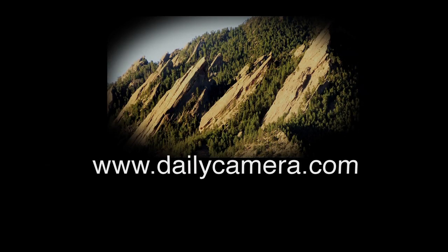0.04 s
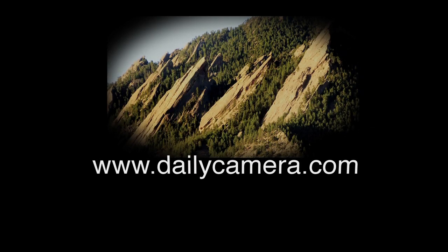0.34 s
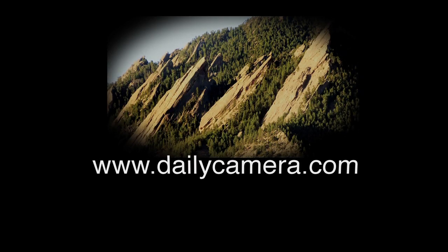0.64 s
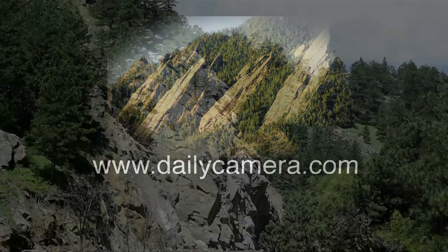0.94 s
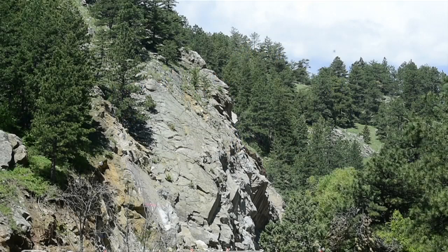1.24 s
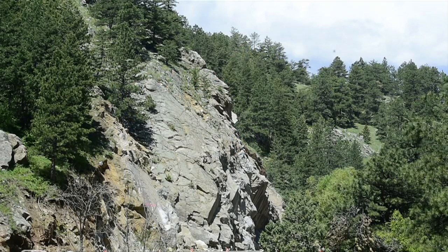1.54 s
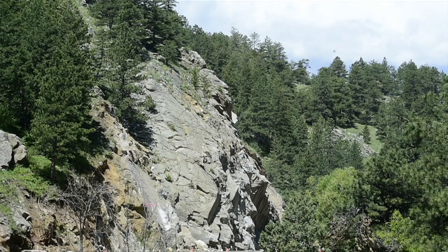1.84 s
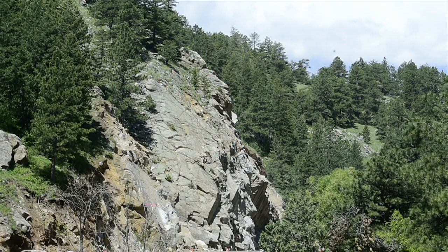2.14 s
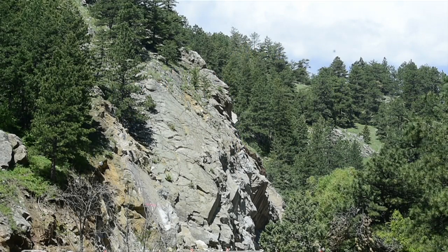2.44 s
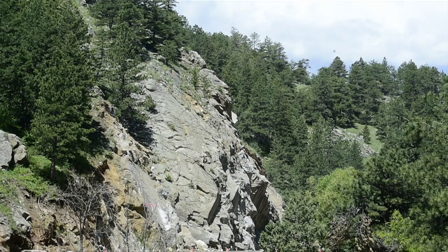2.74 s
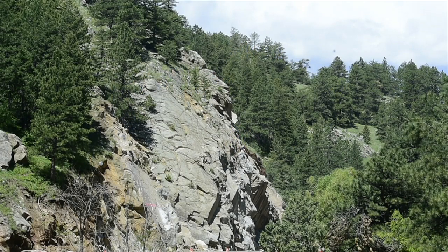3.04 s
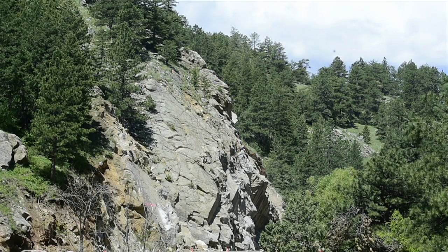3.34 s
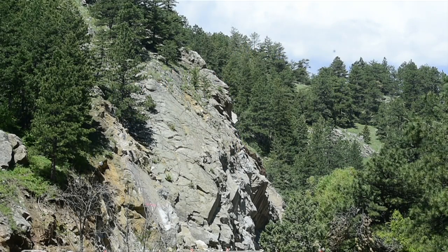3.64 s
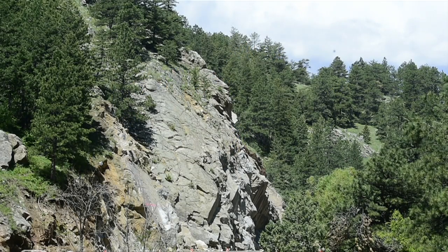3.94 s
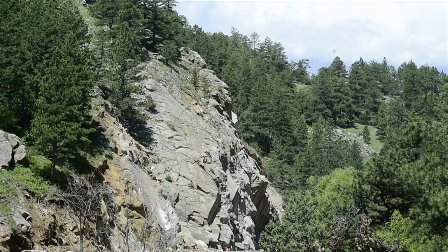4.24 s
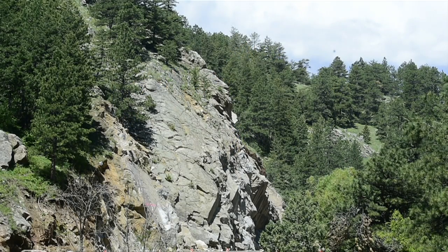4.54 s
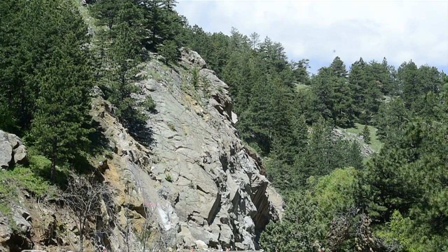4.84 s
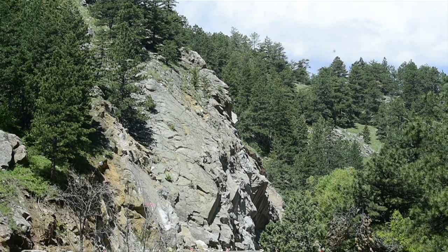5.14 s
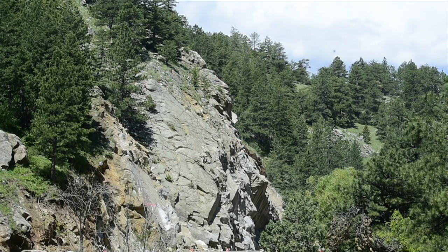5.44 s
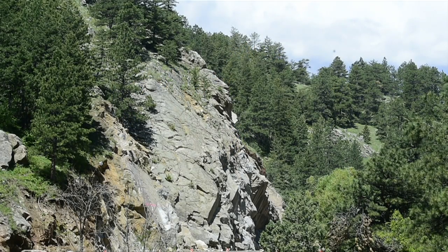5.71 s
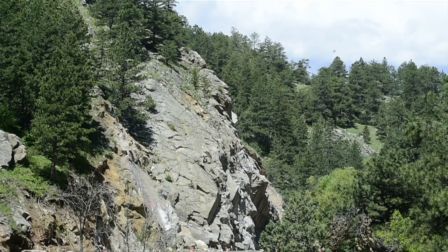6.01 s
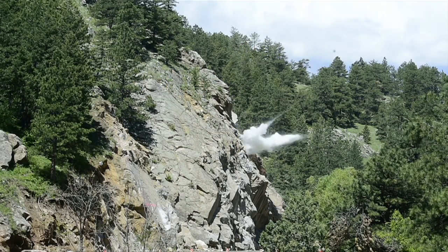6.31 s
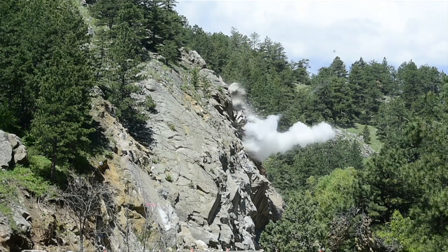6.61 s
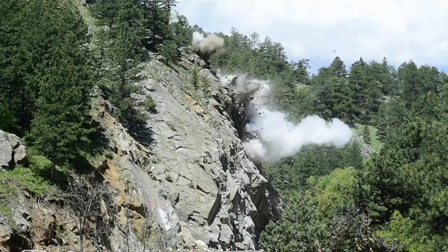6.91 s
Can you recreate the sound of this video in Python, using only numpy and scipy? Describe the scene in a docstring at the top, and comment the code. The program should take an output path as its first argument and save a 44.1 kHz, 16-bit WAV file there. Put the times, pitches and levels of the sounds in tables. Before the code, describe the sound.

Steady wind and rushing water outdoors, then a sharp crack and a louder, distorted blast as rock bursts from a cliff.

```python
"""Rock blasting on a wooded canyon cliff. The steady rush of wind and water fades in, a far bird calls
faintly twice, and gusts buffet the microphone. At 6.6 s a first charge sends out a shock front, which
scatters off rock and trees and reverberates between the walls. A third of a second later the main charges
fire; their low air blast drives the recorder into hard clipping."""
import sys
import numpy as np
from scipy import signal
from scipy.fft import rfft, irfft, next_fast_len
from scipy.io import wavfile
from scipy.ndimage import map_coordinates

SR = 44100
rng = np.random.default_rng(int(sys.argv[2]) if len(sys.argv) > 2 else 0)


def generate_wav(signal):
    """Clip the signal to [-1, 1] and save it as 16-bit WAV at the path in sys.argv[1]."""
    frames = np.transpose(np.atleast_2d(signal))
    scaled = np.clip(frames, -1, 1) * 32767
    pcm = np.round(scaled).astype(np.int16)
    wavfile.write(sys.argv[1], SR, pcm)


N = 311787
TIME = np.arange(N) / SR

# spectrum of wind and water in the canyon, with a faint band of hiss on top: f/Hz, relative level/dB
RUSH_SPECTRUM = [(15, -42), (25, -17), (50, -4.5), (80, -1), (170, -1.5), (350, -.5), (510, -4.5),
                 (700, -7.5), (1600, -13), (2850, -22), (4650, -30), (5450, -28.5), (6900, -35),
                 (11700, -45), (15500, -63)]
# notes of the far bird: t/s, f/Hz, duration/s, level/dB
BIRD_NOTES = [(1.789, 1710, 0.077, -34), (1.817, 2120, 0.1, -37), (3.275, 1197, 0.065, -32),
              (3.354, 1720, 0.1, -29), (3.374, 3700, 0.043, -46)]
# gusts at the microphone: t/s, duration/s, level/dB
WIND_GUSTS = [(4.618, .22, -21.5), (4.87, 0.16, -25.5), (5.215, 0.24, -26), (5.83, 0.056, -29),
              (6.28, 0.098, -30)]
# spectrum of their turbulence: f/Hz, relative level/dB
TURBULENCE_SPECTRUM = [(12, -26), (30, -2), (60, 1.5), (100, 1.5), (210, -4.5), (320, -15.5), (900, -42),
                       (3000, -87)]
# strong single eddies: t/s, level/dB, f/Hz
EDDIES = [(4.692, 0, 124), (4.753, -4.5, 100), (4.795, -3, 131), (4.812, -5, 100), (4.962, -11, 100),
          (5.034, -7.5, 121), (5.319, -9, 70), (5.389, -14, 90), (6.32, -13, 65), (6.368, -13, 75)]
# shock fronts from the charges and the rock face:
# t/s, shock level/dB, f/Hz, scatter level/dB, scatter t60/s, bright share of the scatter (0-1)
SHOCK_FRONTS = [(6.5952, 21.5, 265, -4.5, 0.12, 0.13), (6.608, 4, 300, -7.5, 0.057, 0.16),
                (6.6209, 2, 940, 4.5, 0.031, 0.66), (6.9087, 14.5, 300, 3.5, 0.18, 0.12),
                (6.957, 13, 432, 13, 0.084, 0.3), (7.007, 2, 396, 2.5, 0.14, 0.33),
                (7.02, 5, 500, 6, 0.11, 0.4), (7.039, 2, 596, 9, 0.051, 0.77),
                (7.056, -1, 504, 4.5, 0.13, 0.27)]
# spectrum of dull scatter: f/Hz, relative level/dB
DULL_SPECTRUM = [(20, -37), (110, -5), (230, -2.5), (330, 1), (510, 1.5), (720, -7.5), (1150, -12.5),
                 (3000, -27), (6000, -44), (15000, -61)]
# spectrum of bright scatter and wall reflections: f/Hz, relative level/dB
BRIGHT_SPECTRUM = [(20, -28), (200, 1), (500, 5.5), (750, 0), (1150, 5.5), (2200, -6), (3800, -13.5),
                   (6500, -28), (15000, -65)]
# spectrum of the reverberation at its onset: f/Hz, relative level/dB
REVERB_SPECTRUM = [(20, -17), (90, -8), (240, 0), (480, -0.5), (700, -5.5), (1200, -7), (2200, -14),
                   (4000, -30), (7000, -49), (14000, -78)]
# reverberation time of the canyon: f/Hz, t60/s
REVERB_TIMES = [(100, 1.9), (1000, 3.1), (4000, 4.8), (10000, .6)]
# reflections of the first charge from single walls: delay/s, level/dB, t60/s
WALL_REFLECTIONS = [(0.069, -11, 0.086), (0.178, -16, .04), (.2, -9.5, .035), (.256, -22, .04)]
# spectrum of the roar of bursting rock: f/Hz, relative level/dB
ROAR_SPECTRUM = [(10, -8), (30, -1.5), (50, -1.5), (78, 2.5), (110, -4), (230, -9.5), (420, -19),
                 (1000, -60)]


def amp(db):
    """Amplitude ratio of a level in decibels."""
    return 10 ** (np.asarray(db) / 20)


def along(points, hz):
    """Interpolation of (f/Hz, value) points on a logarithmic frequency axis."""
    f, value = np.transpose(points)
    return np.interp(np.log(hz + 1), np.log(f + 1), value)


def wobble(rate):
    """Smooth random modulation: a spline through `rate` random values a second."""
    return map_coordinates(rng.standard_normal(int(N * rate / SR) + 4), [TIME * rate])


def filtered(x, response):
    """Linear filtering: the spectrum of x is multiplied by a frequency response."""
    size = next_fast_len(N + SR // 2)
    return irfft(rfft(x, size) * response(np.fft.rfftfreq(size, 1 / SR)), size)[:N]


def noise(spectrum):
    """White noise shaped to a spectrum and normalised to rms 1."""
    x = filtered(rng.standard_normal(N), lambda hz: amp(along(spectrum, hz)))
    return x / np.sqrt(np.mean(x ** 2) + 1e-20)


def rise(start, attack):
    """Linear onset from silence to full amplitude."""
    return np.clip((TIME - start) / attack, 0, 1)


def burst(start, t60, attack):
    """Exponential decay, 60 dB in t60 seconds, after a rapid onset."""
    age = np.maximum(TIME - start, 0)
    return (1 - np.exp(-age / attack)) * amp(-60 * age / t60)


def swing(start, hz, t60):
    """Damped oscillation of pressure: compression, rarefaction, then smaller swings."""
    return np.sin(2 * np.pi * hz * (TIME - start)) * burst(start, t60, attack=0.00079)


def canyon_rush(level_db=-27):
    """Turbulent wind and water radiate broadband noise of nearly constant level."""
    return amp(level_db + 0.083 * wobble(1.64) + 0.13 * wobble(12)) * noise(RUSH_SPECTRUM)


def bird(fall=.05, roughness=.028, overtone_db=-16):
    """Random frequency modulation makes each short, falling note hoarse."""
    out = np.zeros(N)
    for start, hz, length, db in BIRD_NOTES:
        progress = np.clip((TIME - start) / length, 0, 1)
        pitch = hz * (1 + fall * (.5 - progress) + roughness * wobble(220))
        phase = 2 * np.pi * np.cumsum(pitch) / SR
        tone = np.sin(phase) + amp(overtone_db) * np.sin(2 * phase)
        out += amp(db) * np.sin(np.pi * progress) * tone
    return out


def gust(start, length, attack=0.04, t60=0.32):
    """The envelope of a gust rises linearly, holds, then decays exponentially."""
    since_end = np.maximum(TIME - start - length, 0)
    return rise(start, attack) * amp(-60 * since_end / t60)


def wind(flutter_db=2, flutter_rate=45, eddy_t60=0.035):
    """Turbulent pressure at the microphone makes a low flutter; the strongest eddies thud."""
    strength = sum(amp(db) * gust(start, length) for start, length, db in WIND_GUSTS)
    flutter = strength * amp(flutter_db * wobble(flutter_rate)) * noise(TURBULENCE_SPECTRUM)
    thuds = sum(amp(db) * swing(start, hz, eddy_t60) for start, db, hz in EDDIES)
    return flutter + thuds


def shocks(cycles=2.9):
    """Each shock front is a heavily damped pressure swing; scattering off rock and trees trails it."""
    out = np.zeros(N)
    for start, shock_db, hz, scatter_db, t60, bright in SHOCK_FRONTS:
        scatter = np.sqrt(1 - bright) * noise(DULL_SPECTRUM) + np.sqrt(bright) * noise(BRIGHT_SPECTRUM)
        out += amp(shock_db) * swing(start, hz, t60=cycles / hz)
        out += amp(scatter_db) * burst(start, t60, attack=0.0004) * scatter
    return out


def reverberation(start, db):
    """Repeated reflections merge into a diffuse tail whose highest treble decays fastest."""
    hz, t, bands = signal.stft(noise(REVERB_SPECTRUM), SR, nperseg=256)
    decay = amp(-60 * np.maximum(t - start, 0) / along(REVERB_TIMES, hz)[:, None])
    tail = signal.istft(bands * decay, SR, nperseg=256)[1][:N]
    build_up = 1 - np.exp(-np.maximum(TIME - start, 0) / 0.0059)
    near_slope = 1 + 2.3 * burst(start, t60=0.21, attack=0.0056)  # it answers first and loudest
    return amp(db + 2.4 * wobble(60)) * build_up * near_slope * tail


def wall_slaps(start):
    """Reflection from bare rock walls returns the crack as separate bright slaps, one per path."""
    envelope = sum(amp(db) * burst(start + delay, t60, attack=0.003)
                   for delay, db, t60 in WALL_REFLECTIONS)
    return envelope * noise(BRIGHT_SPECTRUM)


def air_blast(start=6.99):
    """The bursting rock face displaces air like a piston: jolt, rarefaction, slow wave, sustained roar."""
    jolt = amp(38) * swing(start, hz=228, t60=0.011)
    rarefaction = amp(20) * burst(start + 0.0012, t60=0.027, attack=0.00022)
    slow_wave = amp(16) * swing(start + 0.0053, hz=46, t60=0.041)
    roar = amp(6) * rise(start + 0.012, attack=0.009) * noise(ROAR_SPECTRUM)
    return jolt - rarefaction + slow_wave + roar


def scene():
    """Superposition: the pressures of all sources add at one microphone."""
    first_front, third_front = SHOCK_FRONTS[0][0], SHOCK_FRONTS[2][0]
    cracks = shocks() + wall_slaps(first_front)
    tails = reverberation(first_front, db=-20.5) + reverberation(third_front, db=-19)
    return (canyon_rush() + bird() + wind() + cracks + tails + air_blast())[None]


def record(dry, hardness=7, cutoff_hz=15900, edge_hz=400):
    """After a fade-in, saturation flattens the peaks at full scale and a low-pass limits the band."""
    faded = dry[0] * rise(start=0.65, attack=0.24)
    clipped = faded / (1 + np.abs(faded) ** hardness) ** (1 / hardness)
    return filtered(clipped, lambda hz: np.clip((cutoff_hz - hz) / edge_hz + .5, 0, 1))[None]


dry = scene()
out = record(dry)
generate_wav(out)
```